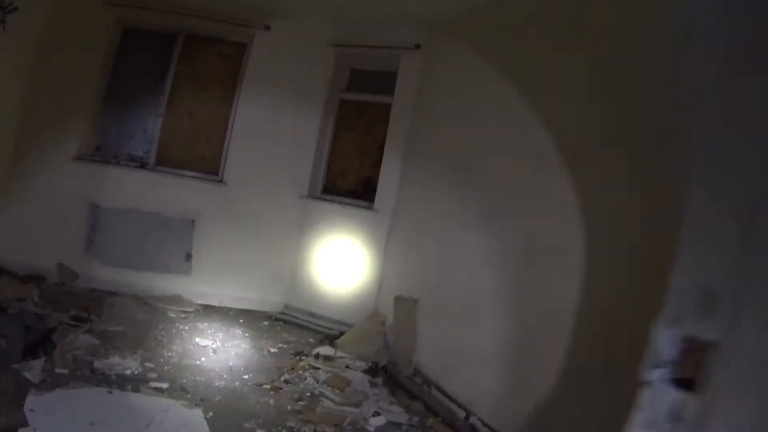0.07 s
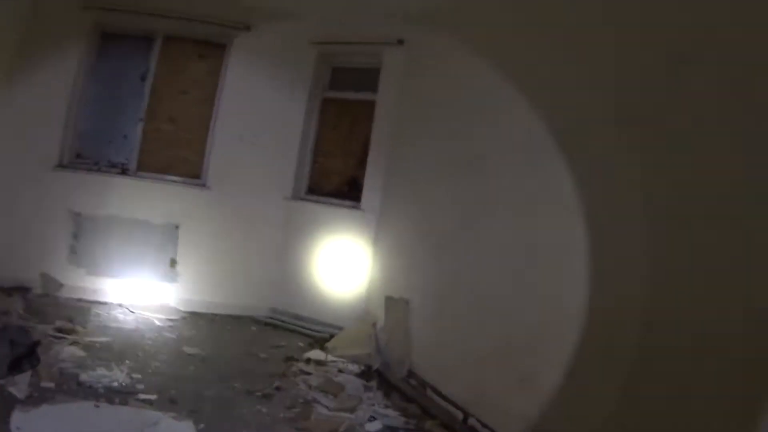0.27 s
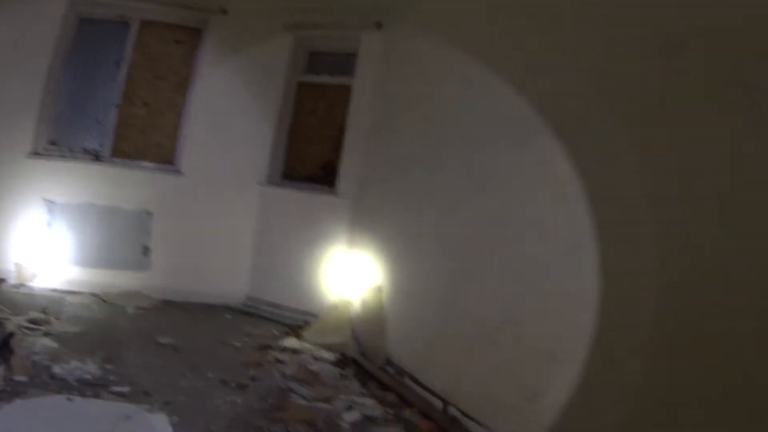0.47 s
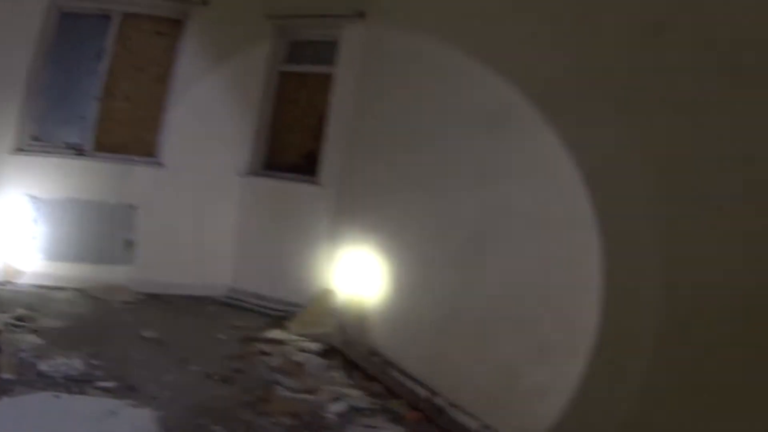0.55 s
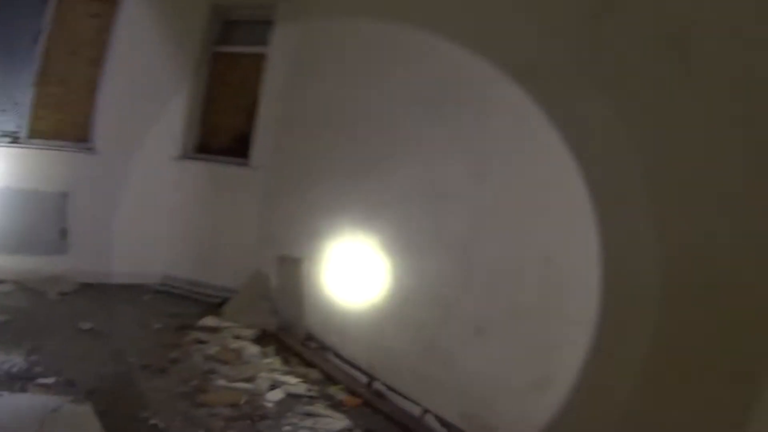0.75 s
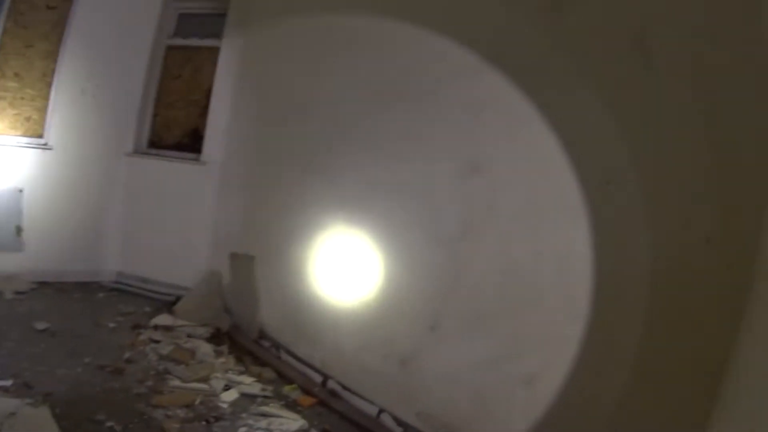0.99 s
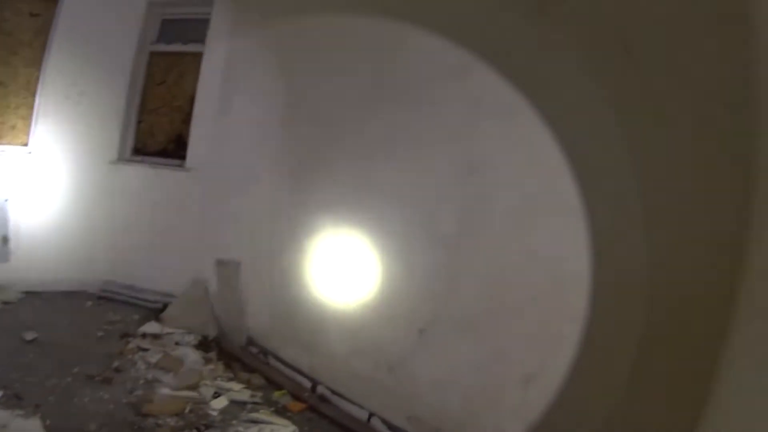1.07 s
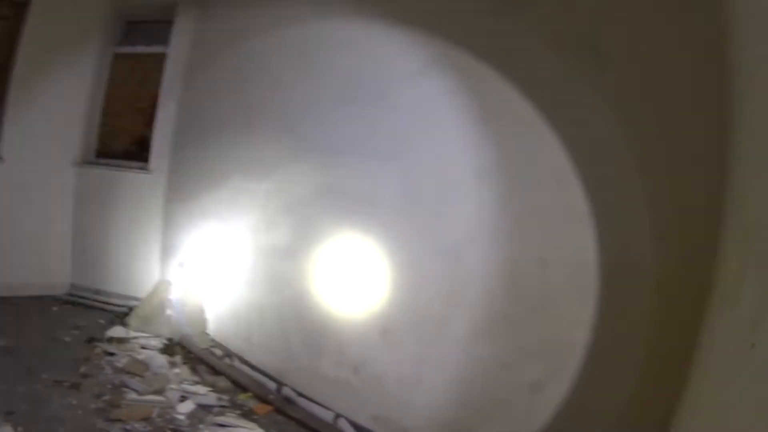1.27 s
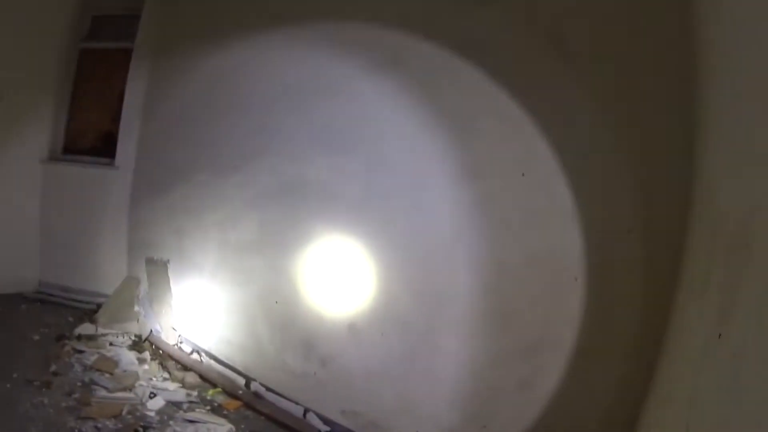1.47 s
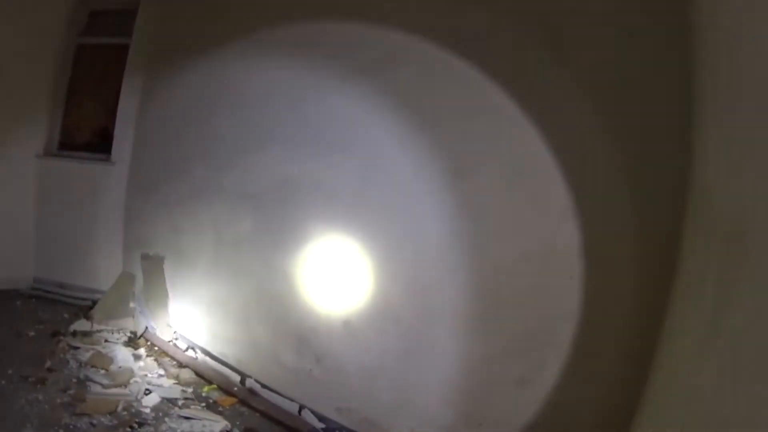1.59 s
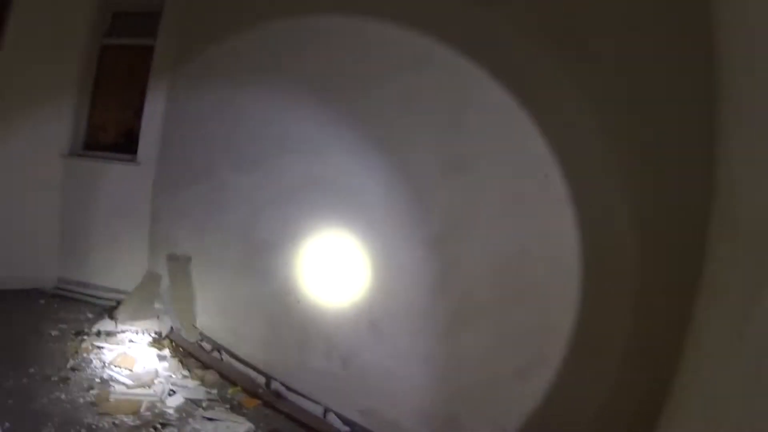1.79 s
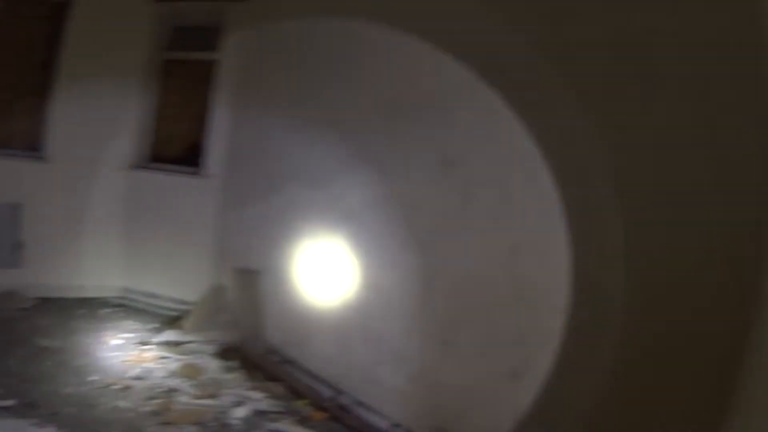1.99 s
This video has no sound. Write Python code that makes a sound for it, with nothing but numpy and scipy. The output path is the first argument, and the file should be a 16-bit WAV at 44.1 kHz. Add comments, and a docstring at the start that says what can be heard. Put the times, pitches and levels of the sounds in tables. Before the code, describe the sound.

A single footstep crunches and snaps fallen plaster in a bare, echoing room.

```python
"""A step on fallen plaster in a bare, derelict room, heard from head height.
The sole scuffs over grit, a plaster flake ticks and then snaps, and a slab under the shoe knocks
on the floor. Hard walls and ceiling throw back crackly echoes and ring on for half a second;
later the weight shifts softly over a faint hiss and rumble."""
import sys
import numpy as np
from scipy import signal
from scipy.fft import rfft, irfft, next_fast_len
from scipy.io import wavfile

SR = 44100
rng = np.random.default_rng(int(sys.argv[2]) if len(sys.argv) > 2 else 0)


def persist_wave(psi):
    """Save psi, clipped to +-1, as 16-bit WAV."""
    counts = np.round(np.clip(psi, -1, 1) * 32767).astype(np.int16)
    wavfile.write(sys.argv[1], SR, np.atleast_2d(counts).T)


N = 90404

# tone of breaking plaster (frequency [Hz], gain [dB])
PLASTER_EQ = [(100, -21.5), (210, -9), (330, 4), (490, 14.5), (680, 10.5), (900, 18.5), (1150, 19),
              (1700, 10.5), (2750, 5.5), (4000, 11.5), (6200, 10), (8300, 2.5), (10500, -8)]
CRUMBLE_DECAY_S, SPLIT_DECAY_S = .0036, .0007


def plaster_snaps():
    """A flake tears, cracks and crumbles within a few milliseconds."""
    # breaks (time [s], level [dB], low-pass [Hz], crumb gain [ratio])
    breaks = [(0.1224, -15, 3742, 0.594), (0.2048, 0.9, 12000, .38)]
    tear_lead_s, out = .0007, 0
    for at, db, top_hz, crumb_gain in breaks:
        tear = amp(-2.5) * cut(crumbs(at - tear_lead_s, SPLIT_DECAY_S), 2800, "high")
        crack = cut(click(at), hz=4640)
        crumble = crumb_gain * crumbs(at, CRUMBLE_DECAY_S)
        out = out + amp(db) * cut(tear + crack + crumble, top_hz)
    return colour(out, PLASTER_EQ)


def slab_knocks():
    """The slab rocks against the floor and rings briefly; a longer contact sounds duller."""
    # knocks (time [s], level [dB], low-pass [Hz], contact time [s], crumb gain [ratio])
    knocks = [(0.3523, -5, 650, 0.0015, .1), (0.3546, -18, 9000, 0.000065, 0.7),
              (0.3560, 0.5, 4970, 0.00012, 0.41), (0.7975, -45, 4000, 0.00012, 0.58),
              (0.9580, -32.5, 1200, .0004, 0.15), (0.9614, -34.5, 2500, 0.00015, 0.74)]
    # slab resonances (frequency [Hz], gain [dB], t60 [s])
    slab_modes = [(477, 30, 0.055), (791, 21.5, .052), (1002.4, 26.5, 0.039), (1112, 27, 0.03),
                  (1294, 17, .022), (2500, 9, 0.0086)]
    # tone of the attack (frequency [Hz], gain [dB])
    contact_eq = [(100, -10), (330, -9.5), (1200, -4), (2000, 7.5), (3100, -9.5), (4000, -11.5), (7000, 5),
                  (10500, -10)]
    t, force = np.arange(N) / SR, 0
    for at, db, top_hz, contact_s, crumb_gain in knocks:
        impact = click(at) + crumb_gain * crumbs(at, CRUMBLE_DECAY_S)
        contact = np.exp(-t / contact_s)
        force = force + amp(db) * cut(convolve(impact, contact / contact.sum()), top_hz)
    body = convolve(force, ring(slab_modes))
    return cut(body + colour(force, contact_eq), 356, "high")  # a small slab radiates little bass


def floor_thuds():
    """Weight lands on the floorboards and sets their low modes ringing."""
    # landings (time [s], level [dB])
    landings = [(0.3548, 9), (0.9583, -6)]
    # floorboard resonances (frequency [Hz], gain [dB], t60 [s])
    board_modes = [(128, -1.3, .12), (170, -1, 0.058)]
    return convolve(sum(amp(db) * click(at) for at, db in landings), ring(board_modes))


def sole_scuff():
    """Grit grinds under the sole for an instant, then dies away."""
    # tone of the grit (frequency [Hz], gain [dB])
    grit_eq = [(100, -10), (290, -5.5), (390, 6.5), (520, -4), (850, 2), (1400, -1), (2200, -3),
               (3500, -13.5), (6000, -21), (10500, -36.5)]
    hold_s, release_s = .028, .012
    grit = colour(grains(per_s=6000), grit_eq)
    since_stop = np.maximum(np.arange(N) / SR - hold_s, 0)
    return amp(-44.5) * grit / grit.std() * np.exp(-since_stop / release_s)


def early_reflections():
    """Thin, crackly echoes of the snaps and main knock return from walls and ceiling about 20 ms later."""
    # echoes (time [s], level [dB], low-pass [Hz])
    echoes = [(0.1395, -30, 3000), (0.223, -22, 5500), (0.2288, -22, 8000), (0.3779, -16.5, 1900),
              (0.3812, -23.5, 1900)]
    crackle = sum(amp(db) * cut(crumbs(at, SPLIT_DECAY_S), top_hz) for at, db, top_hz in echoes)
    return colour(cut(crackle, 1770, "high"), PLASTER_EQ)


def diffuse_echo():
    """Floor scatter comes first, then the nearest walls in one bunch; each octave has its own decay."""
    # reverb time (frequency [Hz], t60 [s])
    decay_times = [(150, 0.83), (450, 0.4443), (1000, 0.48), (2500, 0.53), (5000, 0.69), (10000, 0.55)]
    attack_s, wall_s, wall_fade_s, doubling_s = .003, .014, .019, .016
    t, f = np.arange(N) / SR, np.fft.rfftfreq(N, 1 / SR)
    reflections = rfft(grains(per_s=980 * 2 ** (t / doubling_s)))  # separate at first, soon dense
    wall_bump = .53 * (t >= wall_s) * np.exp(-np.abs(t - wall_s) / wall_fade_s)
    onset = (1 + wall_bump) * np.clip(t / attack_s, 0, 1)
    octaves_hz, out = 125 * 2. ** np.arange(8), 0
    for hz, weights in zip(octaves_hz, np.eye(8)):
        band = irfft(reflections * lookup(list(zip(octaves_hz, weights)), f), N)
        envelope = onset * np.exp(-np.log(1000) * t / lookup(decay_times, hz))
        out = out + band * envelope / np.sqrt(np.sum(envelope ** 2))
    return out


def bare_room():
    """Stereo impulse response of the hard walls: diffuse echo plus standing waves."""
    # reverb width (frequency [Hz], side gain [dB])
    width = [(100, -9.5), (400, -17), (1100, -10.5), (2000, -9.5), (10000, -12)]
    # reverb tone (frequency [Hz], gain [dB])
    echo_eq = [(100, -5), (300, -0.5), (480, -4), (700, -4), (1000, -8), (2000, -6), (3200, -3.5),
               (6000, -11), (10000, -8.5)]
    # standing waves (frequency [Hz], gain [dB], t60 [s])
    room_modes = [(417.4, 1.5, 0.46), (485, -8.5, 0.306), (776, -12, 0.6), (953, -6.5, 0.48)]
    tail = stereo(diffuse_echo(), colour(diffuse_echo(), width))
    return colour(tail, echo_eq) + ring(room_modes)


def background_hiss():
    """A faint bed of hiss and rumble whose level drifts a little."""
    # tone of the hiss (frequency [Hz], relative level [dB])
    hiss_eq = [(12, -27), (20, -3.5), (43, -3), (77, -13), (130, -17.5), (204, -18), (227, -22.5),
               (328, -21), (428, -23), (764, -23.5), (827, -26), (2940, -30), (11000, -44), (14300, -76.5),
               (22000, -120)]
    # width of the hiss (frequency [Hz], side gain [dB])
    width = [(60, -29), (110, -12.5), (190, -6), (340, -0.5), (610, 2), (1080, 4.5), (1930, 2.5),
             (3440, -0.5), (6120, -4), (10900, -7.5)]
    mid, side = colour(rng.standard_normal((2, N)), hiss_eq)
    drift_db = 1.2 * np.interp(np.arange(N), np.linspace(0, N, 16), rng.standard_normal(size=16))
    return stereo(mid, colour(side, width)) / mid.std() * amp(-61 + drift_db)


def crumbs(at, decay_s):
    """A fast-fading burst of tiny clicks, energy 1."""
    age = np.arange(N) / SR - at
    burst = grains(per_s=11000) * (age > 0) * np.exp(-np.abs(age) / decay_s)
    return burst / np.sqrt(np.sum(burst ** 2) + 1e-12)


def grains(per_s):
    """Random clicks of random size, rms about 1."""
    chance = np.clip(per_s / SR, 1e-4, 1)
    return (rng.random(N) < chance) * rng.standard_normal(N) / np.sqrt(chance)


def click(at):
    """A unit pulse at a time in seconds."""
    x = np.zeros(N)
    x[int(np.clip(at * SR, 0, N - 1))] = 1
    return x


def ring(modes):
    """Impulse response of damped modes; dB is the gain at resonance."""
    t, out = np.arange(N) / SR, 0
    for hz, db, t60 in modes:
        damping = np.log(1000) / t60
        out = out + amp(db) * 2 * damping / SR * np.exp(-damping * t) * np.cos(2 * np.pi * hz * t)
    return out


def colour(x, points):
    """Minimum-phase EQ through (frequency [Hz], gain [dB]) points."""
    size = 2 * next_fast_len(N)
    gain = amp(lookup(points, np.fft.rfftfreq(size, 1 / SR)))
    cepstrum = irfft(np.log(gain))
    cepstrum[1:size // 2] *= 2
    cepstrum[size // 2 + 1:] = 0
    return irfft(rfft(x, size) * np.exp(rfft(cepstrum)))[..., :N]


def cut(x, hz, kind="low"):
    """Second-order low-pass or high-pass."""
    sos = signal.butter(2, min(hz, SR / 2 - 100), kind, fs=SR, output="sos")
    return signal.sosfilt(sos, x + 1e-18)


def convolve(x, response):
    """Play x through an impulse response."""
    size = 2 * next_fast_len(N)
    return irfft(rfft(x, size) * rfft(response, size))[..., :N]


def lookup(points, hz):
    """Read (frequency [Hz], value) points on a log-frequency axis."""
    f, values = np.array(points, float).T
    return np.interp(np.log(hz + 1e-3), np.log(f), values)


def amp(db):
    """Decibels to gain."""
    return 10 ** (np.asarray(db) / 20)


def stereo(mid, side):
    """Mid and side to left and right."""
    return np.array([mid + side, mid - side])


def scene():
    """The step arrives directly and by way of the bare walls, over a faint hiss and rumble."""
    hits = plaster_snaps() + early_reflections() + slab_knocks() + floor_thuds()
    scuff, scuff_send_db = sole_scuff(), 7
    reverb = convolve(hits + amp(scuff_send_db) * scuff, bare_room())
    return hits + scuff + reverb + background_hiss()


def record(dry):
    """Two close microphone ports differ a little in timing and level; a steep low-pass cuts the top."""
    # left minus right (frequency [Hz], level [dB])
    balance = [(100, 1.2), (400, 0.11), (1100, 4.1), (2500, -0.072), (5000, -1.1), (10000, -0.49)]
    # lead of the left port (frequency [Hz], phase [rad])
    phase_lead = [(100, -0.02), (500, 0.33), (1100, -0.7), (3200, -1.1), (6000, 0.28)]
    f, sign = np.fft.rfftfreq(2 * N, 1 / SR), np.array([[1], [-1]])
    ports = amp(sign * lookup(balance, f) / 2) * np.exp(.5j * sign * lookup(phase_lead, f))
    heard = irfft(rfft(dry, 2 * N) * ports)[:, :N]
    top_hz = 11150
    return signal.sosfilt(signal.ellip(10, .2, 70, top_hz, fs=SR, output="sos"), heard)


dry = scene()
out = record(dry)
persist_wave(out)
```